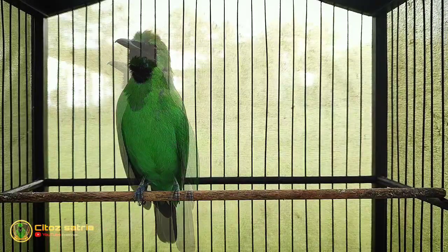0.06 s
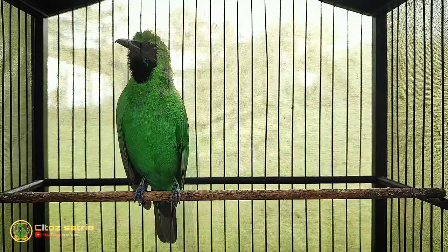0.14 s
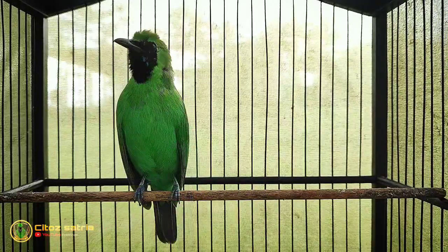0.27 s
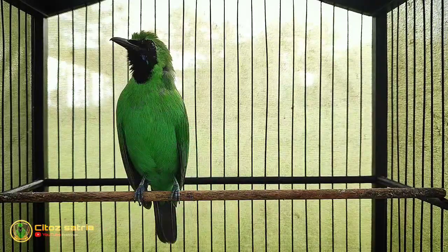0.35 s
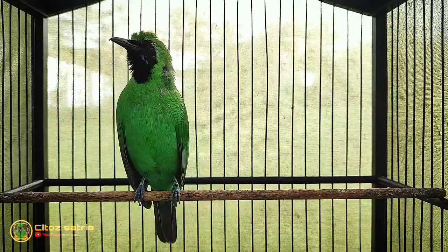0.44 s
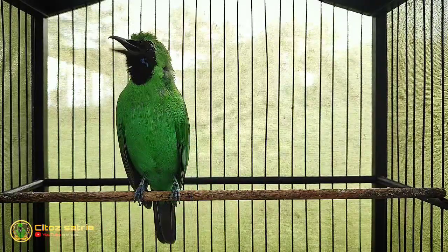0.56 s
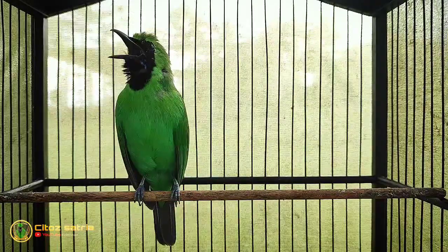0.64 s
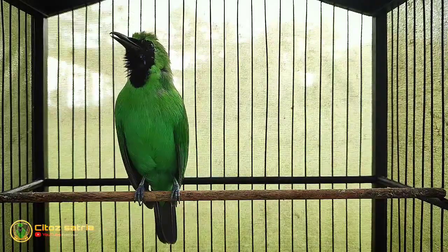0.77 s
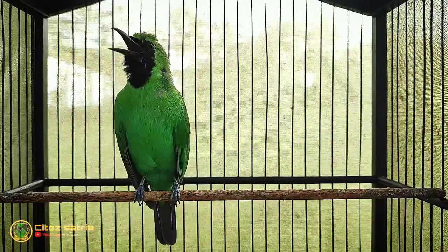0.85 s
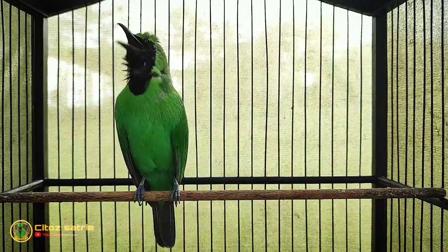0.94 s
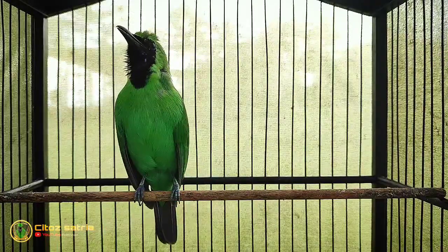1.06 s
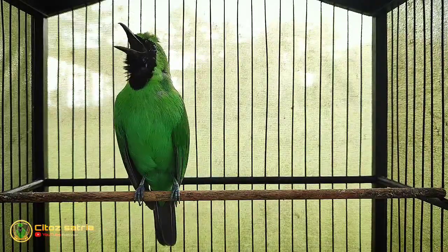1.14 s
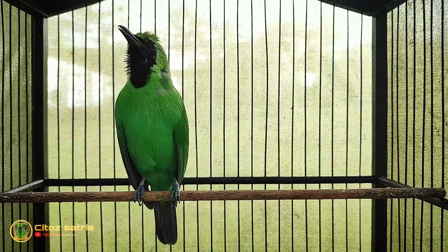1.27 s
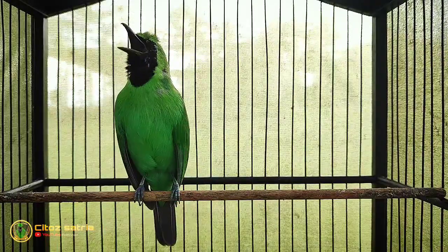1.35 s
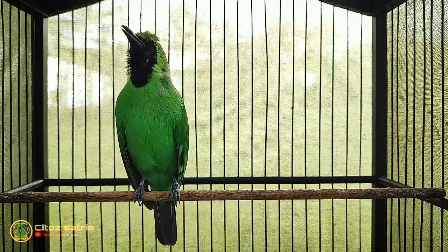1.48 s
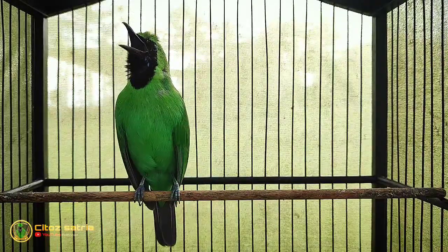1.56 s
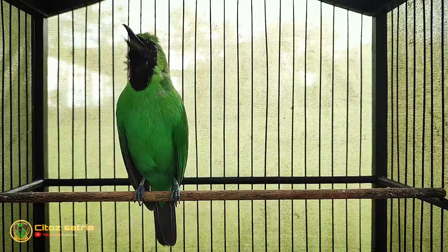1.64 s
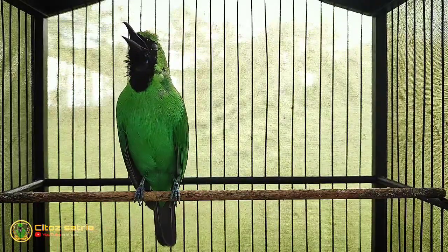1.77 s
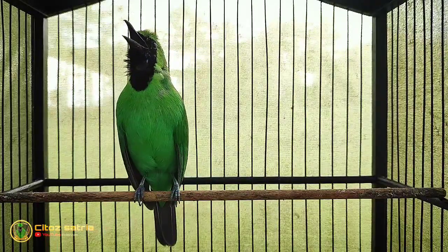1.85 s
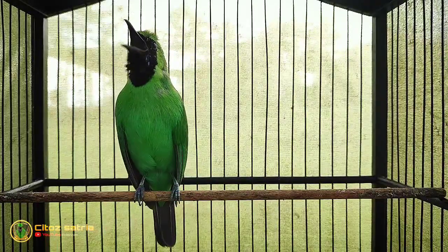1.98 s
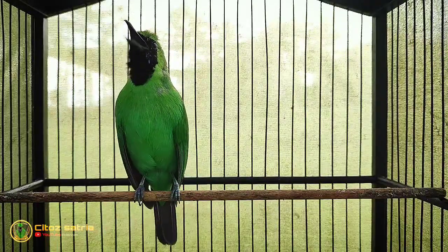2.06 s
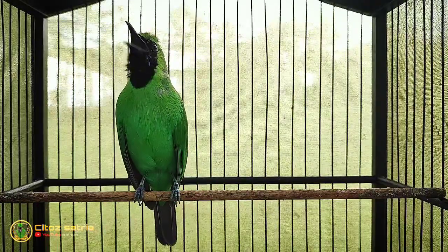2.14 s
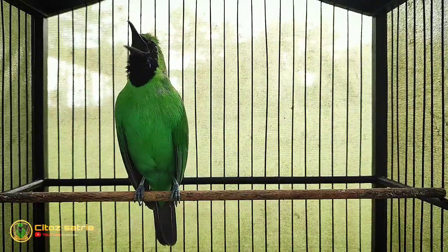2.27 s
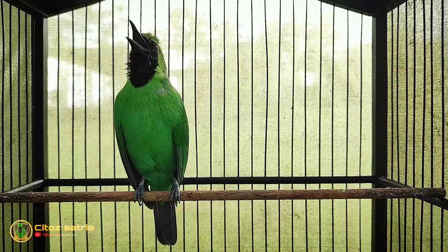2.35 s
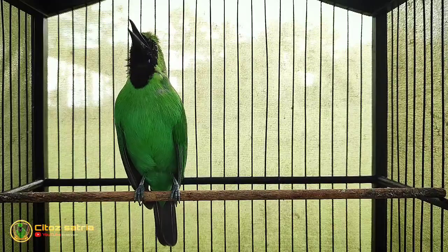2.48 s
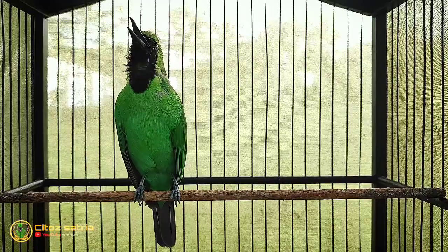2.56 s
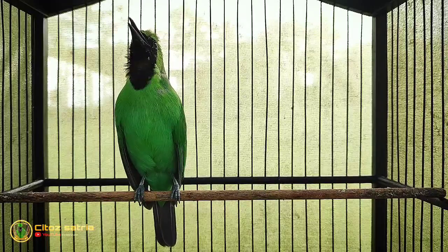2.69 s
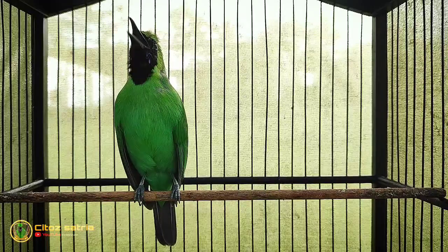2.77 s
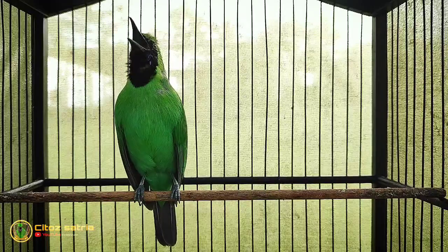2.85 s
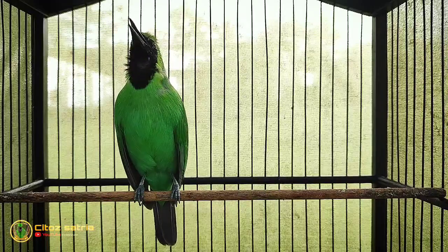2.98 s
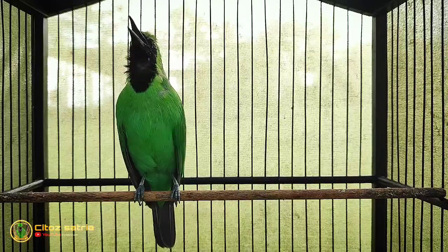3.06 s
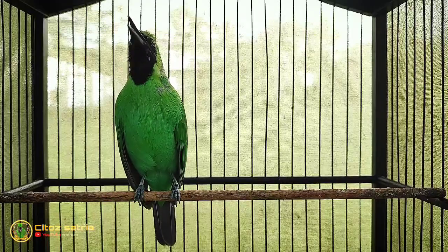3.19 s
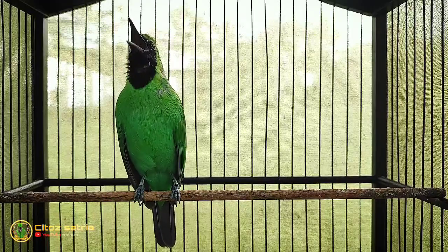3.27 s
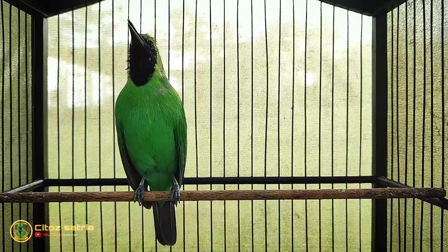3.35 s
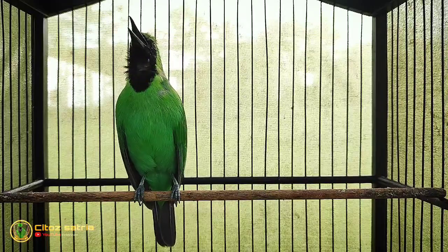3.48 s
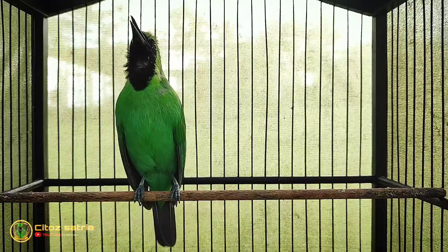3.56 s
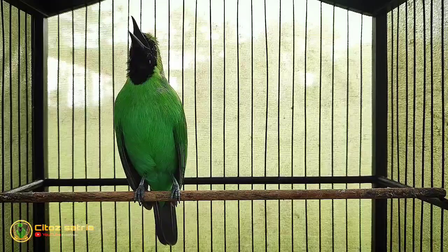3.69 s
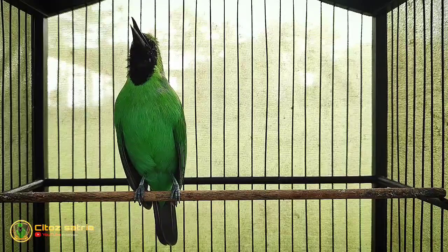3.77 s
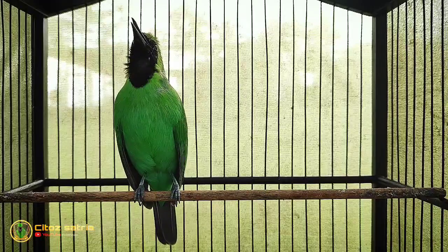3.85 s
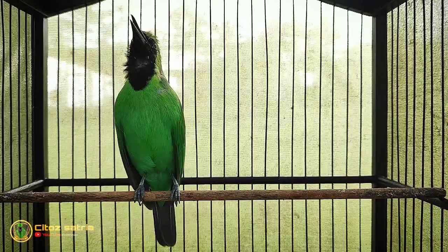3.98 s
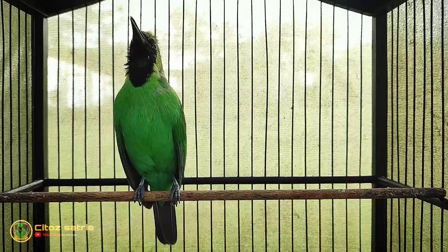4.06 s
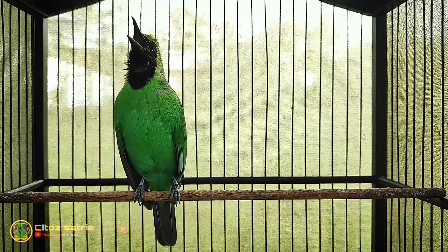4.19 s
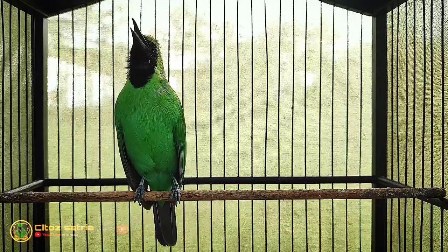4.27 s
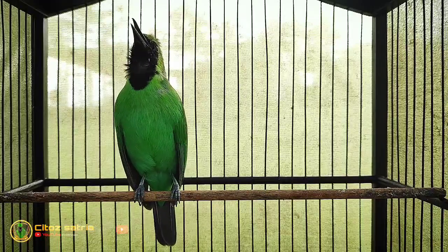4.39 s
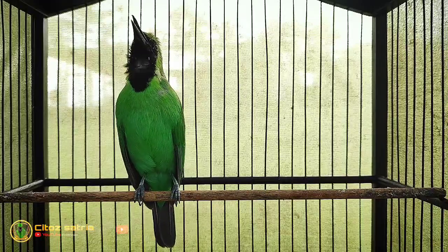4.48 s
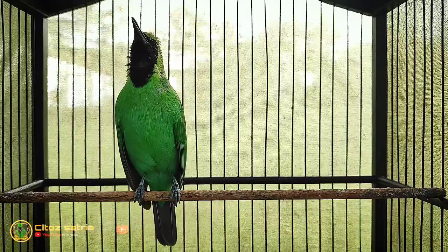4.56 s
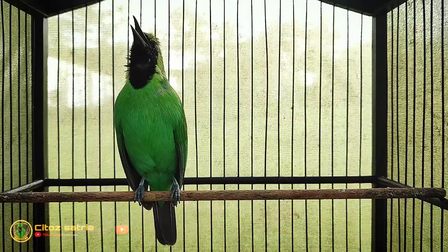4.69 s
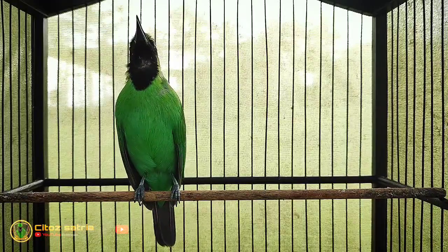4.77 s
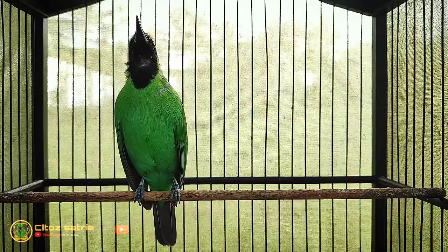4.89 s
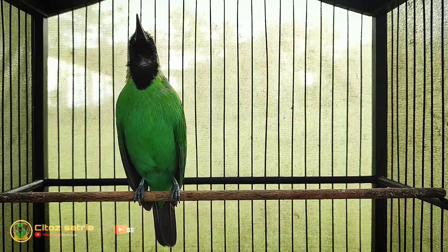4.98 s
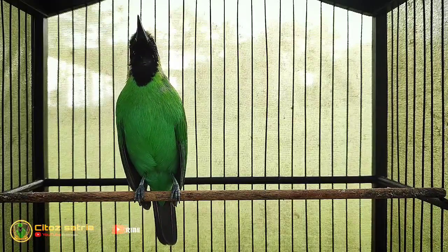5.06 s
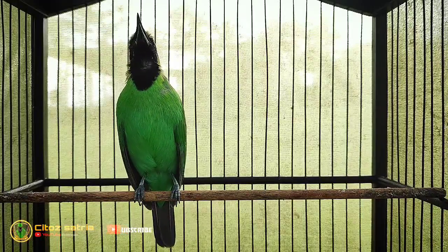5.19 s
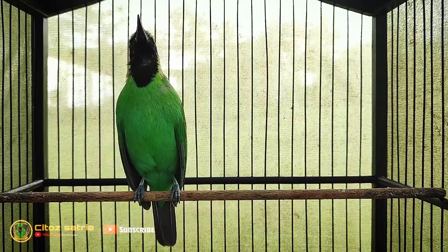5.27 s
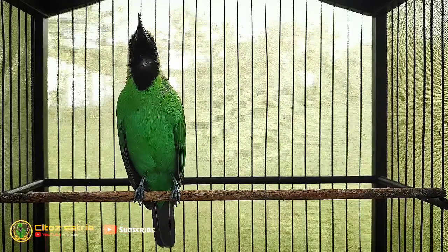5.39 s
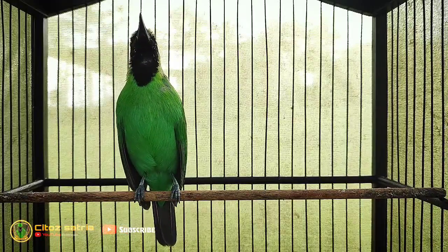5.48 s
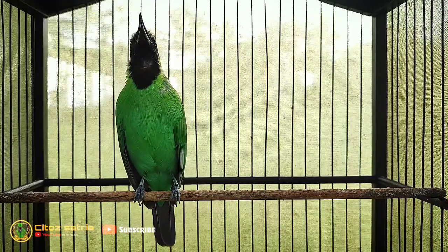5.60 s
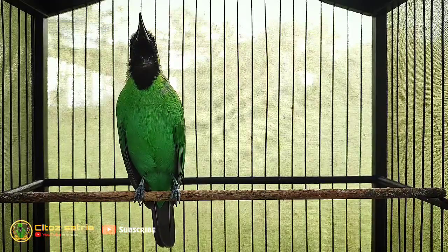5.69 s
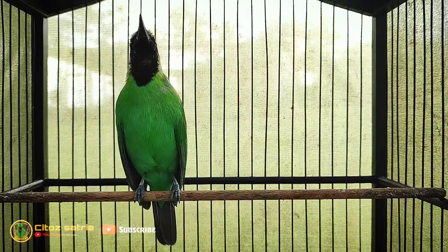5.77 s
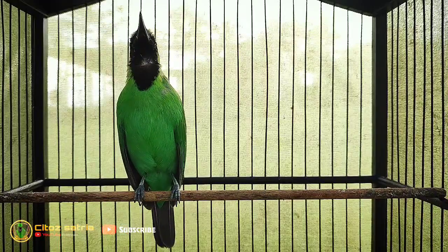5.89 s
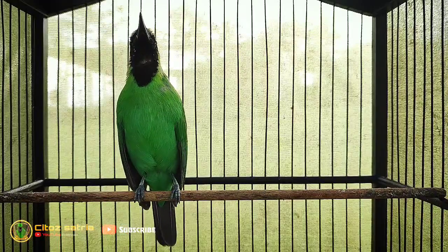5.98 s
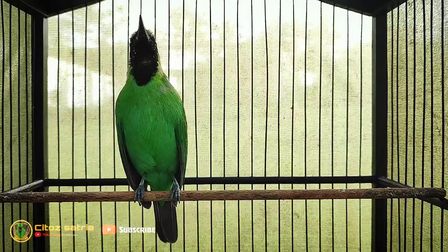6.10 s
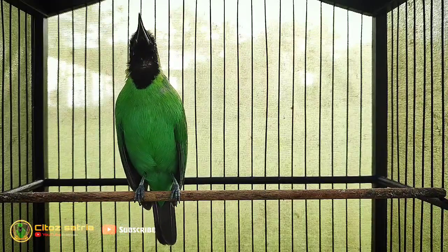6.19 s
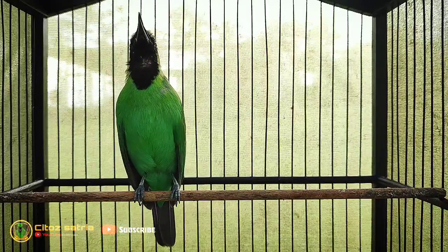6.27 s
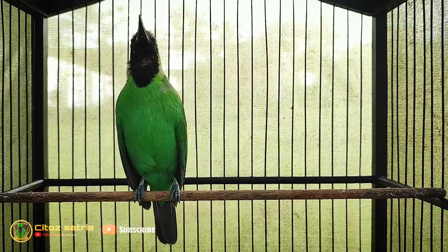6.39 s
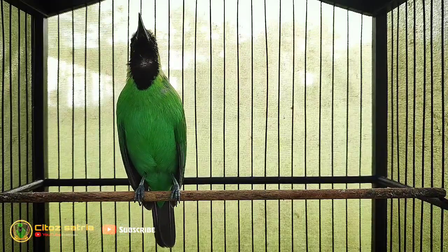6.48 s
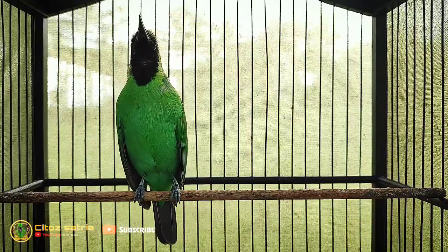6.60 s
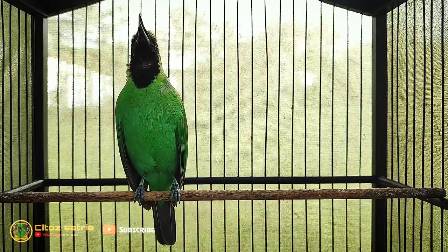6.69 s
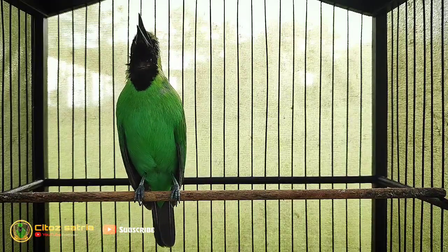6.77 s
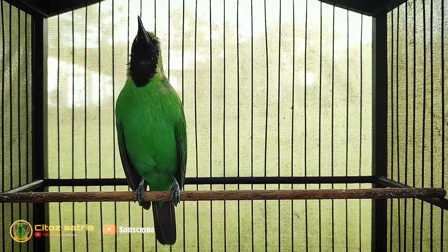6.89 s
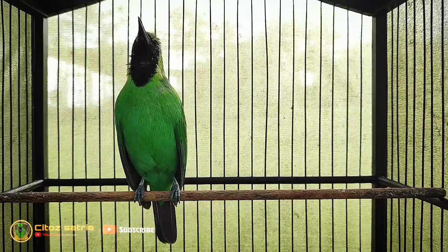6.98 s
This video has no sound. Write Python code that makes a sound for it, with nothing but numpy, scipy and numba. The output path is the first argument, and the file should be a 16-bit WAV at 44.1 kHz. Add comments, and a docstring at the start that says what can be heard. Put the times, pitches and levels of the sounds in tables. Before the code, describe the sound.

A small caged songbird sings loudly close to a phone microphone. After a moment of low throbbing rumble and hiss, it gives sharp two-part chirps and a brief screech, then quick gritty chips, low buzzes and a downward slur. High gliding whistles follow among swelling peeps and raspy scrapes, and finally high and low whistles alternate steadily. The rumble dips under loud notes; the room adds only a faint, dull echo.

```python
"""A leafbird sings in a cage close to a phone, over a low throbbing rumble, a hiss and a faint call further off.
It opens with sharp two-voiced chirps and a screech, then gritty chips, buzzes and a downward slur.
High whistles follow among peeps and scrapes; at the end high and low whistles alternate.
Each side of its syrinx makes one gliding tone; where both sound they mix and rasp.
The phone's limiter holds the loud notes down, so the rumble ducks and creeps back after them."""
import sys
import numpy as np
from scipy import signal
from scipy.fft import rfft, irfft
from scipy.io import wavfile
from scipy.ndimage import uniform_filter1d, minimum_filter1d
from numba import njit

SR = 44100
rng = np.random.default_rng(int(sys.argv[2]) if len(sys.argv) > 2 else 0)


def dump(signal):
    """Clip the signal to [-1, 1] and save it as 16-bit WAV at the path in sys.argv[1]."""
    limited = np.clip(np.atleast_2d(signal).T, -1, 1)
    pcm = np.round(limited * 32767).astype(np.int16)
    wavfile.write(sys.argv[1], SR, pcm)


N = 310464
T = np.arange(N) / SR

# how throat and open beak colour the overtones and the rasp: f/Hz, level/dB
BEAK_COLOUR = [(800, -24.5), (2500, 0.5), (5000, -5.5), (6000, -4), (7200, -2.5), (10000, 10), (12000, 0),
               (14000, 4.5), (15500, -8)]
# spectrum of the turbulent air in the syrinx: f/Hz, level/dB
RASP_SPECTRUM = [(600, -33.5), (2600, 16.5), (4200, 11), (6000, 3.5), (8000, 3.5), (11000, -14),
                 (13700, -9), (15500, -19.5)]
# low whistle, a soft shallow arch that drops at the end:
# t/share of length, f/share of top pitch, level/dB, rasp/0-1
LOW_ARCH_SHAPE = [(0, .92, -18.5, 0.083), (.4, 1, -6, 0.088), (.68, .95, -4.5, 0.044),
                  (.92, .88, -7.5, .05), (1, 0.821, -10, 0.45)]


def undb(db):
    """Decibels to gain."""
    return 10 ** (np.asarray(db) / 20)


def curve(points, hz):
    """Read (Hz, value) points on a log-frequency axis."""
    f, value = np.transpose(points)
    return np.interp(np.log(hz + 1), np.log(f), value)


def colour(x, points):
    """Filter by a spectrum of (Hz, dB) points."""
    gain = undb(curve(points, np.fft.rfftfreq(N, 1 / SR)))
    return irfft(rfft(x) * gain, N)


def noise(points):
    """Noise of rms 1 with the given spectrum."""
    x = colour(rng.standard_normal(N), points)
    return x / x.std()


def wander(rate_hz):
    """Smooth random motion of spread 1, mostly slower than the given rate."""
    lowpass = 1 / (1 + (np.fft.rfftfreq(N, 1 / SR) / rate_hz) ** 4)
    x = irfft(rfft(rng.standard_normal(N)) * lowpass, N)
    return x / x.std()


def span(start, length):
    """The samples of a note and how far through it each one lies (0-1)."""
    i = np.arange(int(start * SR), min(int((start + length) * SR), N))
    return i, np.linspace(0, 1, len(i))


def glide(u, places, values):
    """Join a few points by lines with rounded corners, as muscles move."""
    return uniform_filter1d(np.interp(u, places, values), len(u) // 10, mode="nearest")


def whistles(waver_hz=9, growl_hz=430, press_db=15, mixing_db=-16, rasp_db=-29, meeting_db=-34,
             puff_db=-39, puff_s=0.014, crack_db=-20, crack_s=0.004, spit_db=-33):
    """Nearly pure gliding tones with weak overtones; a puff of air starts each, and they rasp where two meet."""
    # a tone's partials from the second up: level/dB
    overtones_db = [-36, -38, -50.5, -42.5, -43.5, -44]
    tone, squares, overtones, hoarse, effort, power = np.zeros((6, N))
    beat, beat_hz = flutter()
    waver = waver_hz * wander(130)  # for a clean tone; rasp widens it
    # a hard-pressed membrane takes on a second, slower and uneven swing: it gives sidebands and chops the air
    growl = np.sin(2 * np.pi * growl_hz * T + 2 * wander(130))
    scatter = [undb(3 * wander(40)) for _ in overtones_db]
    for note in song():
        s, *controls = np.transpose(note)
        start = s[0]
        i, u = span(start, s[-1] - start)
        pitch, level_db, rasp = (glide(T[i], s, control) for control in controls)
        press = np.sqrt(abs(rasp))
        hz = pitch + beat_hz[i] + waver[i] * (1 + 10 * rasp)
        phase = 2 * np.pi * np.cumsum(hz) / SR
        gate = np.sin(np.pi / 2 * np.interp(u, [0, .14, .9, 1], [0, 1, 1, 0])) ** 2
        size = undb(level_db) * gate * beat[i] * (1 + rasp * press * growl[i])
        voice = size * np.sin(phase)
        tone[i] += voice
        squares[i] += voice ** 2
        effort[i] += size
        power[i] += size ** 2
        hoarse[i] += size * undb(rasp_db) * rasp ** 2
        # each beat of a flutter spits air
        hoarse[i] += size * undb(spit_db) * np.maximum(beat[i] - 1, 0)
        # a side that opens under full pressure cracks
        hoarse[i] += undb(crack_db + level_db[0]) * rasp[0] * np.exp(-(T[i] - start) / crack_s)
        # pressed notes are brighter
        for k, db in enumerate(overtones_db):
            overtones[i] += size * undb(db + press_db * press) * scatter[k][i] * np.sin((k + 2) * phase)
        # air escapes before the tone has built up, far more for high notes
        j, v = span(start - puff_s, 4 * puff_s)
        hoarse[j] += undb(puff_db) * (hz.mean() / 3000) ** 4 * np.sin(np.pi * v) ** 2
    # the two sides share one airstream: their product adds sum and difference tones
    mixed = (tone ** 2 - squares) / (np.abs(effort) + .1)
    # where they meet the flow turns turbulent
    meeting = np.sqrt(np.abs(effort ** 2 - power))
    hoarse += undb(meeting_db) * uniform_filter1d(meeting, size=700)
    air = hoarse * (1 + growl) * noise(RASP_SPECTRUM)
    return tone + colour(overtones + undb(mixing_db) * mixed + air, BEAK_COLOUR)


def song():
    """Every tone as rows (s, Hz, dB, rasp); tones that overlap are the two sides singing together."""
    # Shapes, the gesture of one side: t/share of length, f/share of top pitch, level/dB, rasp/0-1
    # chirp: one side sweeps up, then the other takes over about a musical third lower
    chirp_rise = [(0, .66, -6, .25), (.1, .885, -6.5, .12), (.33, 1, -1, 0), (.64, 0.96, 3, 0.73)]
    chirp_tail = [(.54, .75, 3.1, 0.72), (.69, 0.79, 3.5, .4), (.93, .88, 5, 0.067), (1, .86, 3, .1)]
    # chip: a gritty catch that clears into a short tone
    chip_shape = [(0, 0.87, -23.5, 0.73), (.25, 0.94, -7.5, 1), (.55, 1, -1, .15), (1, .94, -10.5, 0.1713)]
    # peep: a scoop up to a held tone that swells
    peep_shape = [(0, 0.81, -14, .45), (.24, 0.96, -7.5, 0.14), (.45, 0.98, -1, 0.03), (.8, 0.94, 6, .06),
                  (1, 0.98, 11, .15)]
    # Syllables: start t/s, length t/s, top f/Hz, level/dB
    chirps = [(0.62, 0.11, 4043, 0.5), (1.15, 0.11, 3983, -0.5), (1.367, .117, 3963, 2),
              (1.573, 0.11, 3972, 5)]
    chips = [(1.772, .049, 2912, 0), (1.854, .04, 3058, -3), (1.928, .04, 3150, 2)]
    peeps = [(2.807, 0.12, 4036, 0.15), (3.708, 0.11, 4043, -2)]
    low_whistles = [(4.923, 0.12, 1936, -0.61), (5.383, 0.11, 1957, 0.03), (5.873, .116, 1922, 0),
                    (6.458, 0.1, 1956, 0.25)]
    # scrapes: start t/s, length t/s, top f/Hz, level/dB, final upward flick f/Hz
    scrapes = [(3.235, .141, 4045, -2, 867), (4.155, .166, 4030, 0, 213.3)]
    # high whistles: start t/s, length t/s, shelf f/Hz, drift along the shelf f/Hz,
    # crest f/Hz, landing f/Hz, level/dB
    high_whistles = [(2.574, 0.15, 2632, -260, 2645, 2435, -1), (3.007, 0.15, 2429, -24.5, 2676, 2214, 0),
                     (3.452, .152, 2334, 110.5, 2802, 2366, -0.5),
                     (3.909, 0.13, 2405, 34.5, 2510, 2228, -2.5), (4.426, 0.13, 2314, 73, 2329, 2110, -5),
                     (4.696, .148, 2745, 10.5, 2865, 2272, -3), (5.165, .14, 2498, 36, 2784, 2304, -2),
                     (5.627, 0.14, 2344, 154.5, 2494, 2190, -2.5),
                     (6.189, .155, 2497, 55, 2743, 2396, -2.5), (6.721, .16, 2583, 2, 2772, 2370, -1.5)]
    # slurs sung only once: t/s, f/Hz, level/dB, rasp/0-1
    screech = [(0.846, 3000, -11, 0.9), (0.868, 3924, -1, 0.34), (0.888, 4560, -15, 0.82),
               (0.925, 4405, -8.5, 0.58), (0.955, 4550, -0.5, 0.4), (0.972, 3750, -1.5, 0.77),
               (1.014, 2432, -1, 0)]
    screech_undertone = [(0.87, 2150, -20.5, 0.17), (0.909, 2530, -16, 0.11), (0.952, 2350, -22, 0.25)]
    downslur = [(2.384, 3100, -13, 0.27), (2.402, 3490, -9.5, .4), (2.436, 3510, 8, 0.071),
                (2.473, 3070, 10.5, 0.035), (2.495, 2950, -1.5, 0.15)]
    kinds = [(chirp_rise, chirps), (chirp_tail, chirps), (chip_shape, chips), (peep_shape, peeps),
             (LOW_ARCH_SHAPE, low_whistles)]
    tones = [syllable(shape, *row) for shape, rows in kinds for row in rows]
    tones += [voice for row in scrapes for voice in scrape(*row)]
    tones += [voice for row in high_whistles for voice in high_whistle(*row)]
    return tones + [screech, screech_undertone, downslur]


def syllable(shape, start, length, top_hz, db):
    """Stretch a shape to one syllable's time, pitch and level: rows (s, Hz, dB, rasp)."""
    return np.array([start, 0, db, 0]) + np.array(shape) * [length, top_hz, 1, 1]


def high_whistle(start, length, shelf_hz, drift_hz, crest_hz, landing_hz, db,
                 scoop=.88, droop=.93, trail_from=0.6, trail_db=-15, trail_sharp_hz=113.6):
    """Scoop onto a shelf, crest and fall; the other side softly trails the fall, and the two beat."""
    # onset, shelf from, shelf to, crest from, crest to, landing, end: t/share of length, level/dB, rasp/0-1
    stages = [(0, -10.5, 0.3), (0.142, -3.5, .03), (.39, 0, 0.07), (.53, 4, 0), (.64, 5, .03),
              (.85, -.5, 0), (1.001, -3, 0.31)]
    places, level_db, rasp = np.transpose(stages)
    end_hz = droop * landing_hz
    hz = [scoop * shelf_hz, shelf_hz, shelf_hz + drift_hz, crest_hz, crest_hz, landing_hz, end_hz]
    lead = np.transpose([start + length * places, hz, db + level_db, rasp])
    trail = [(start + length * trail_from, crest_hz + trail_sharp_hz, db + trail_db, 0),
             (start + length, end_hz + trail_sharp_hz, db + trail_db, 0)]
    return [lead, trail]


def scrape(start, length, top_hz, db, flick_hz, flick_from=.76, flick_to=.88):
    """A rasping side sinks while the other climbs to meet it, carries on alone and flicks up."""
    # the two sides: t/share of length, f/share of top pitch, level/dB, rasp/0-1
    upper_shape = [(.08, .94, -17.5, 0.25), (.27, 0.97, -4, 0.14), (.45, .94, -3, 0.64), (.6, .85, 3, 0.81)]
    lower_shape = [(0, 0.68, -11.5, .4), (.2, .7, -13, 0.17), (.45, .82, -0.5, 0.12), (.7, .785, 4.5, .15),
                   (.88, .79, 7.5, .2), (1, .79, 3, 0.16)]
    lower = syllable(lower_shape, start, length, top_hz, db)
    # finer steps in time make room for the flick
    s = np.linspace(lower[0, 0], lower[-1, 0], 50)
    lower = np.transpose([np.interp(s, lower[:, 0], column) for column in lower.T])
    lower[:, 1] += flick_hz * np.interp((s - start) / length, [flick_from, flick_to], [0, 1])
    return [syllable(upper_shape, start, length, top_hz, db), lower]


def flutter(length_s=0.061, swing_hz=170, break_at_s=3.124, break_s=.01):
    """Brief fast beating of the membranes, as gain and pitch offset, and one instant where the tone breaks off."""
    # centre t/s, beat rate f/Hz, depth/0-1
    beats = [(2.689, 111.6, 0.3), (3.084, 101.7, 0.7), (3.574, 147, 0.25), (4.005, 105.5, 0.2),
             (4.805, 211, 0.3), (5.281, 184, 0.65), (5.732, 123.5, 0.52), (6.228, 71.3, 0.71),
             (6.856, 170.7, 0.31)]
    gain, offset_hz = np.ones(N), np.zeros(N)
    for centre, rate, depth in beats:
        i, u = span(centre - length_s / 2, length_s)
        turn = 2 * np.pi * rate * (T[i] - centre)
        window = np.sin(np.pi * u) ** 2
        gain[i] += depth * window * np.cos(turn)
        offset_hz[i] += swing_hz * depth * window * np.sin(turn + np.pi / 4)
    # a high whistle breaks off just before it lands
    unbroken = 1 - np.exp(-((T - break_at_s) / break_s) ** 4)
    return gain * unbroken, offset_hz


def buzzes(rasp_db=-22):
    """Membranes slap shut at a low rate: a rough harmonic stack, its fourth partial picked out by the throat."""
    # buzzes, alone or under a scrape: start t/s, length t/s, top f/Hz, level/dB, jitter/share of pitch
    calls = [(2.008, .053, 1040, -10.5, 0.042), (2.112, 0.088, 1297, -8.5, 0.012),
             (2.24, 0.091, 1330, -6.5, .011), (3.248, 0.06, 1387, -13, .028),
             (4.167, 0.076, 1430, -19.5, 0.023)]
    # t/share of length, f/share of top pitch, level/dB
    buzz_shape = [(0, 0.52, -32.5), (0.198, 0.94, -5), (.4, 1, 4.5), (.65, 0.91, 4.5), (.9, .87, 0),
                  (1, 0.98, -43.5)]
    # partials from the first up: level/dB
    partials_db = [-35, -20.5, -7, 0, -19.5, -17.5, -23.5, -13.5, -24.5, -18, -21, -27]
    out, hoarse = np.zeros((2, N))
    places, pitch, level_db = np.transpose(buzz_shape)
    unrest, flicker = wander(600), 1 + .24 * wander(500)
    for start, length, top_hz, db, jitter in calls:
        i, u = span(start, length)
        hz = top_hz * glide(u, places, pitch) * (1 + jitter * unrest[i])
        phase = 2 * np.pi * np.cumsum(hz) / SR
        size = undb(db + np.interp(u, places, level_db)) * flicker[i]
        for k, partial_db in enumerate(partials_db):
            out[i] += size * undb(partial_db) * np.sin((k + 1) * phase + rng.uniform(0, 2 * np.pi))
        hoarse[i] += size * (1 + np.cos(phase))  # air hisses once a cycle
    return out + undb(rasp_db) * colour(hoarse * noise(RASP_SPECTRUM), BEAK_COLOUR)


def cage(x, scatter_db=-2, ring_s=0.0062, corner_hz=7000):
    """Bars and panels scatter the short waves: many tiny echoes comb the treble, differently in each channel."""
    t = T[:SR // 50]
    response = rng.standard_normal((2, len(t))) * np.exp(-t / ring_s)
    # level of the scatter ahead of its high-pass
    response *= undb(scatter_db) / np.sqrt(np.sum(response ** 2) / 2)
    highpass = signal.butter(2, corner_hz, "high", fs=SR, output="sos")
    response = signal.sosfilt(highpass, response)
    return x + signal.fftconvolve(x, response, axes=1)[:, :N]


def ports(x):
    """The two microphone channels differ in phase and level from band to band."""
    # right channel against left: f/Hz, phase lag/radians, left minus right level/dB
    bands = [(125.6, 1.05, -4.5), (486, 1.1, 0), (1830, 1.84, -1), (2200, 2.036, 2.5), (2336, 2.32, -2),
             (2935, 2.946, 6.5), (3904, 4.61, -4), (3940, 6.53, -1.5), (4740, 5.13, -1.5),
             (7254, 4.9, 10.5), (8290, 12.4, -26), (10400, 9.4, 5.5), (11150, 15.34, 2)]
    table, hz = np.array(bands), np.fft.rfftfreq(N, 1 / SR)
    lag, tilt_db = curve(table[:, [0, 1]], hz), curve(table[:, [0, 2]], hz)
    # each channel takes half of the difference
    half = undb(tilt_db / 2) * np.exp(.5j * lag)
    return irfft(rfft(x) * np.array([half, 1 / half]), N)


def room(x, tail_db=-35, t60_s=0.74, dull_hz=2600):
    """A few close echoes and a faint, dull diffuse tail."""
    # early echoes off the cage and the walls: delay t/s, left level/dB, right level/dB
    echoes = [(.0021, -21, -19), (.0071, -20, -20)]
    t = T[:SR // 2]
    response = rng.standard_normal((2, len(t))) * undb(-60 * t / t60_s)
    # level of the tail ahead of its low-pass
    response *= undb(tail_db) / np.sqrt(np.sum(response ** 2) / 2)
    response = signal.sosfilt(signal.butter(3, dull_hz, fs=SR, output="sos"), response)
    for delay, *db in echoes:
        response[:, int(delay * SR)] += undb(db)
    return signal.fftconvolve(x, response, axes=1)[:, :N]


def far_birds():
    """Faint, wavering arched whistles of other birds further off."""
    # start t/s, length t/s, top f/Hz, level/dB
    far_calls = [(0.31, 0.18, 2820, -29.5), (5.31, .09, 2144, -23.5), (5.527, 0.055, 3300, -25.5)]
    out, waver = np.zeros(N), 1 + .02 * wander(90)
    for row in far_calls:
        s, hz, db, _ = syllable(LOW_ARCH_SHAPE, *row).T
        i, u = span(*row[:2])
        phase = 2 * np.pi * np.cumsum(glide(T[i], s, hz) * waver[i]) / SR
        arch = np.sqrt(np.sin(np.pi * u))
        out[i] += undb(glide(T[i], s, db)) * arch * np.sin(phase)
    return out


def rumble(swell_db=2, throb=0.43, throb_hz=18, bump_s=0.017):
    """Two bands of low noise that throb fairly evenly, with a few soft bumps."""
    # spectra of the deep and the higher band: f/Hz, level/dB per Hz
    deep_spectrum = [(18, -92), (30, -53.5), (67, -23.5), (112, 1.5), (151, -10), (193, -10.5), (421, -35),
                     (1000, -42.5), (1300, -121), (2200, -120)]
    high_spectrum = [(18, -44.5), (30, -37.5), (69, -40), (86, -3.5), (146, 8.5), (473, -28), (1000, -51),
                     (1300, -65), (2200, -120)]
    # the weight moves from deep to higher: t/s, deep level/dB, higher level/dB
    levels = [(0, -34, -58), (2.7, -28, -37.5), (3.602, -37, -67.5), (4.3, -38.5, -41), (4.698, -48, -34),
              (6.2, -35.5, -38.5), (6.7, -82, -29.5), (7.04, -44.5, -34)]
    # bumps: t/s, f/Hz, level/dB
    bumps = [(0.584, 91.5, -19.5), (1.108, 87.4, -18), (3.25, 84.5, -18), (4.06, 88, -23.5),
             (4.15, 78, -25.5)]
    s, deep_db, high_db = np.transpose(levels)
    deep = undb(np.interp(T, s, deep_db)) * noise(deep_spectrum)
    high = undb(np.interp(T, s, high_db)) * noise(high_spectrum)
    turn = 2 * np.pi * throb_hz * T + wander(2)
    out = (deep + high) * undb(swell_db * wander(8.1)) * (1 + throb * np.sin(turn))
    for at, hz, db in bumps:
        bell = np.exp(-((T - at) / bump_s) ** 2)
        out = out + undb(db) * bell * np.sin(2 * np.pi * hz * (T - at))
    return out


def hiss(level_db=-47):
    """A steady background hiss: noise that thins out toward the treble."""
    # f/Hz, level/dB per Hz
    hiss_spectrum = [(200, 6), (600, 0.5), (2500, 0), (5000, -8.5), (6500, -16.5), (8700, -11),
                     (10500, -12.5), (13000, -36), (15500, -29)]
    return noise(hiss_spectrum) * undb(level_db)


def scene():
    """The birds through cage and microphones with the room's echoes, over rumble and combed hiss."""
    birds = cage(ports(whistles() + buzzes() + far_birds()))
    return birds + room(birds) + ports(rumble()) + cage(ports(hiss()))


@njit
def recover(over_db, release):
    """Gain reduction that follows a rise at once and lets go slowly."""
    out, held = np.empty(len(over_db)), 0.
    for i in range(len(over_db)):
        held = max(over_db[i], held * release)
        out[i] = held
    return out


def record(dry, ceiling_db=0.22, release_s=0.076, top_hz=15600):
    """The phone's look-ahead limiter, one gain for both channels, then a steep treble cut."""
    peak_db = 20 * np.log10(np.abs(dry).max(axis=0) + 1e-9)
    over_db = np.maximum(peak_db - ceiling_db, 0)
    gain = undb(-recover(over_db, np.exp(-1 / (release_s * SR))))
    # the gain starts to fall shortly ahead of each peak
    gain = uniform_filter1d(minimum_filter1d(gain, size=129), size=129)
    treble_cut = signal.ellip(8, .2, 70, top_hz, fs=SR, output="sos")
    return signal.sosfilt(treble_cut, dry * gain)


dry = scene()
out = record(dry)
dump(out)
```